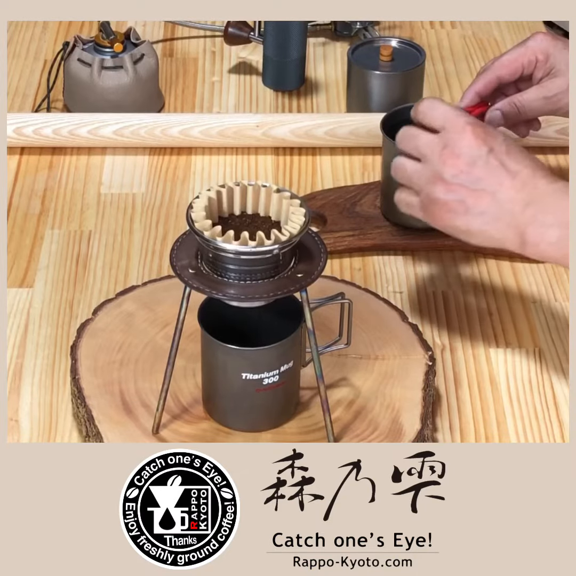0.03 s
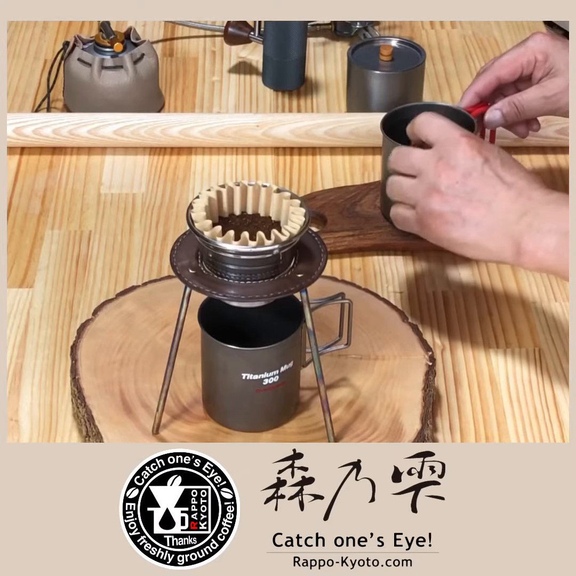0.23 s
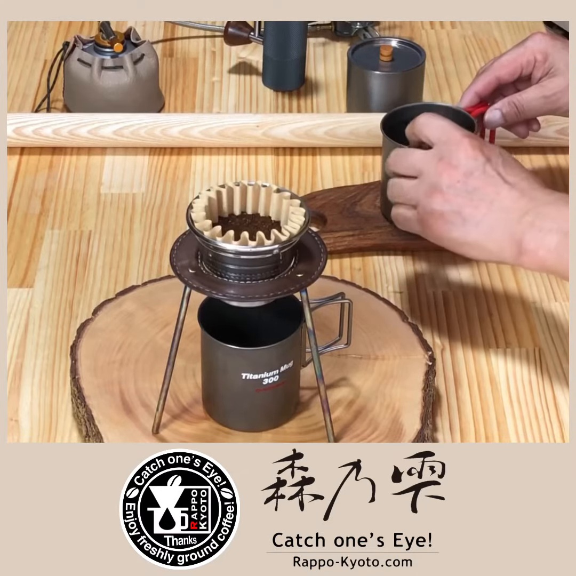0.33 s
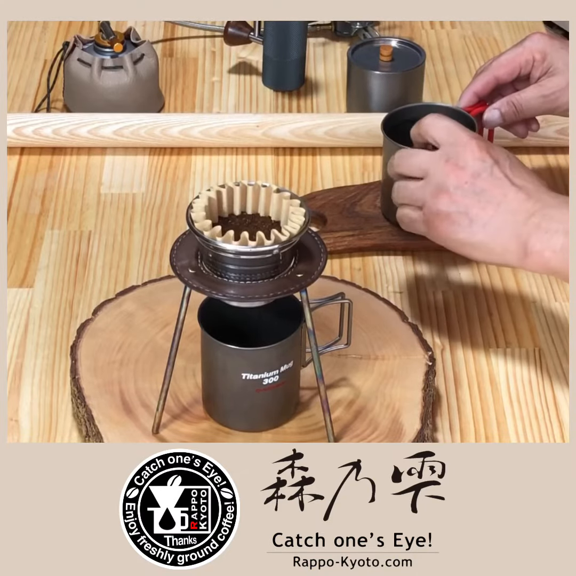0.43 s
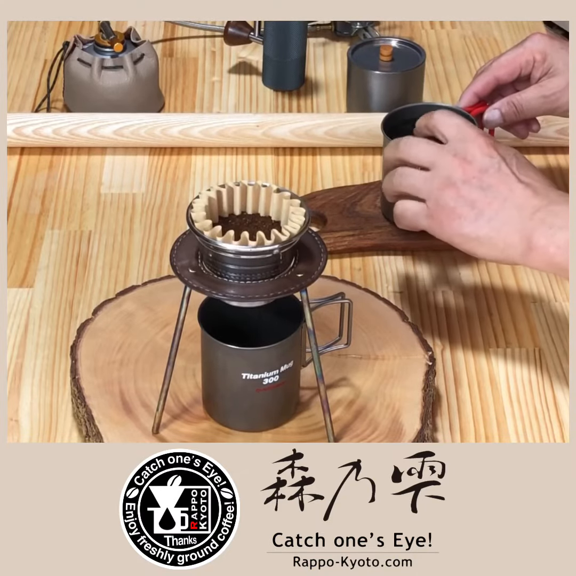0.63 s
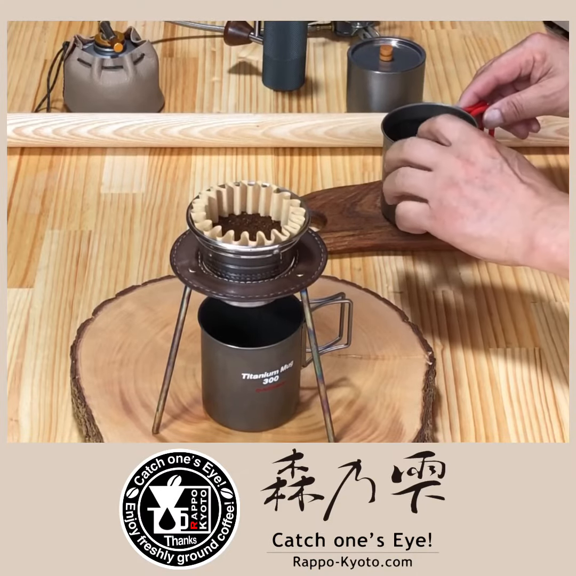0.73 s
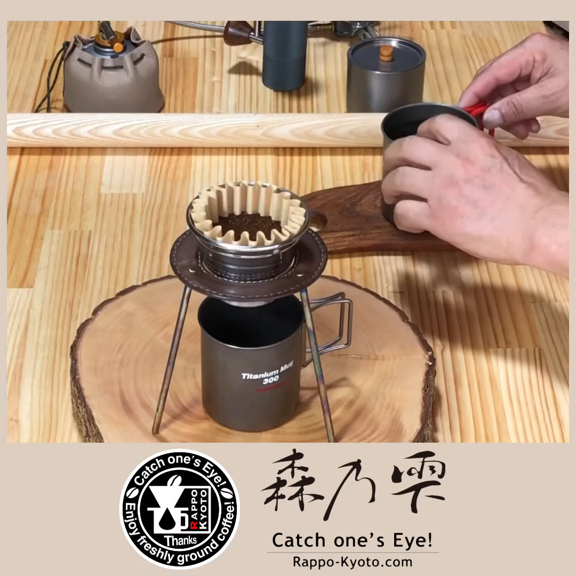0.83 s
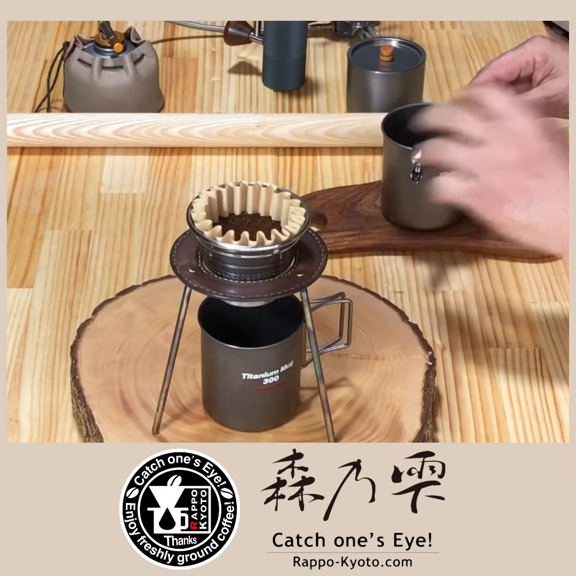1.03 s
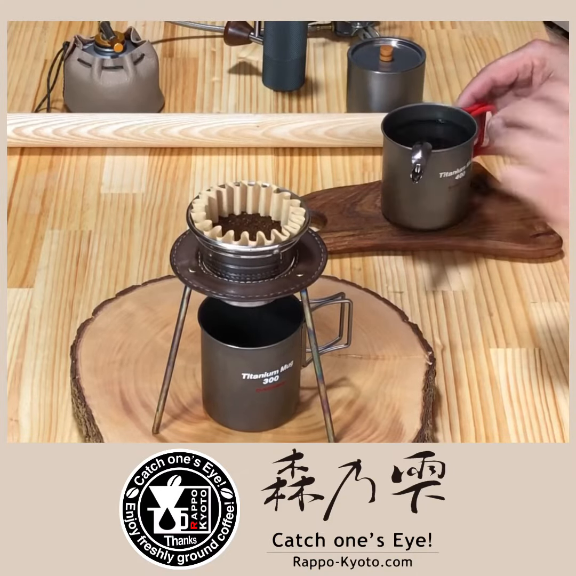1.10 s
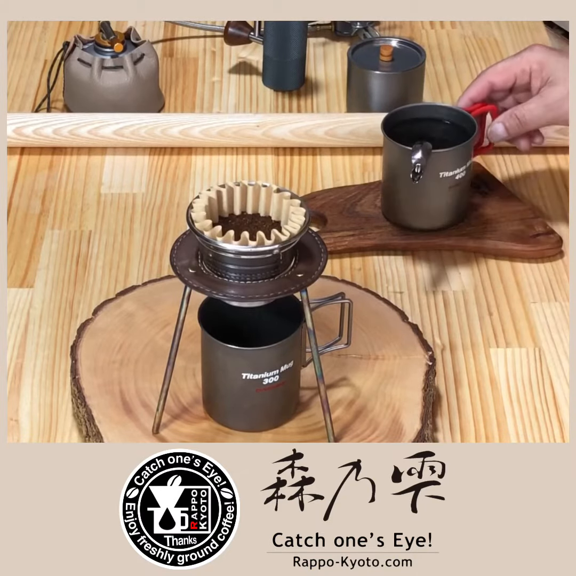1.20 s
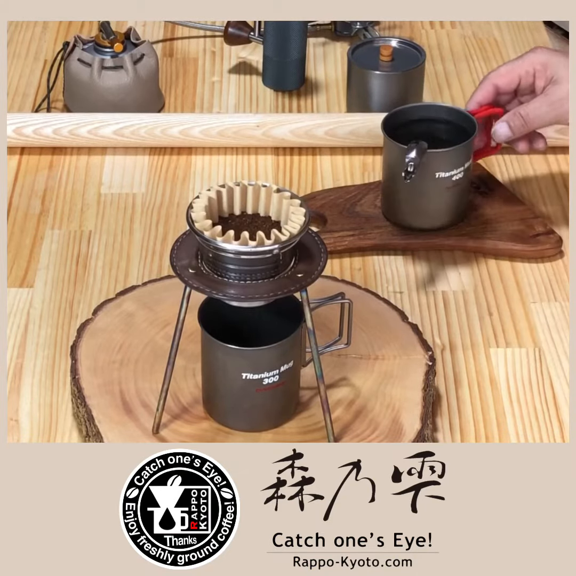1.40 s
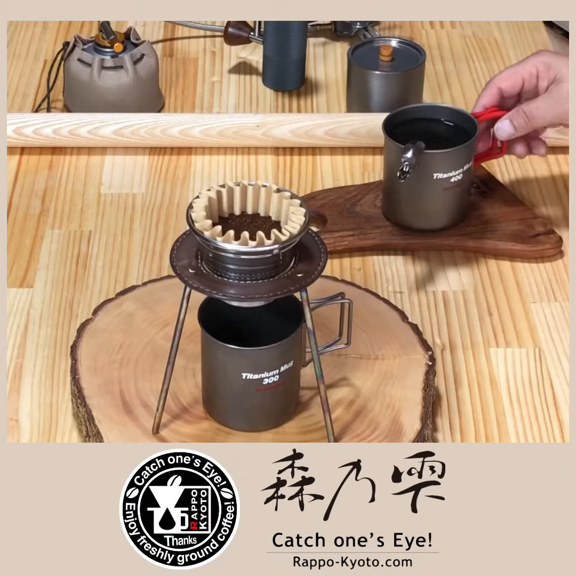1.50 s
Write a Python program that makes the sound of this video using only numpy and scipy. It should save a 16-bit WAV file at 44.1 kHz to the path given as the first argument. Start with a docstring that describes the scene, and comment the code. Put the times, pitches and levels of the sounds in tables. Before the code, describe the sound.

A small metal spout scrapes onto the rim of a thin metal mug, knocking lightly at the start and snapping on with a bright, short clink at about 0.2 seconds, with a soft wooden thud underneath. A faint hollow bump follows near 0.8 seconds. From 1.1 to 1.5 seconds, fingers shift with faint ticks. Quiet room noise and a low wavering hum lie beneath.

```python
"""A short scrape, a knock, then a bright clink: a small metal spout is pushed onto the rim of a thin
metal mug and snaps home. Each contact rings the metal and the mug's hollow, and the wooden board
and table thud underneath. The hand damps the metal quickly; a small room carries the ring on.
Fingers then shift and let go with faint ticks and bumps, over quiet room noise and a wavering low hum."""
import sys
import numpy as np
from scipy import signal
from scipy.fft import rfft, irfft
from scipy.io import wavfile
from scipy.ndimage import uniform_filter1d

SR = 44100
rng = np.random.default_rng(int(sys.argv[2]) if len(sys.argv) > 2 else 0)


def persist_wave(psi):
    """Save psi, clipped to +-1, as 16-bit WAV."""
    counts = np.round(np.clip(psi, -1, 1) * 32767).astype(np.int16)
    wavfile.write(sys.argv[1], SR, np.atleast_2d(counts).T)


N = 68355
TIME = np.arange(N) / SR


# modes of the hand-held mug and spout: f/Hz, first-ring level/dB, after-ring level/dB (both relative)
METAL_MODES = [(2060, -12, -38), (2700, -12, -45), (3374, 2, -28), (3592, 3, -33), (4040, -10, -36),
               (4445, -8, -29), (5087, -10, -31), (6033, -5, -28), (6190, -6, -40), (7130, -6, -30),
               (7420, -8, -35), (7877, -12, -34), (8550, -2, -35), (9480, -6, -36), (9955, -5, -35),
               (10950, -5, -46), (11630, -2, -44), (15210, -12, -43)]
RING_T60_S, AFTER_RING_T60_S = .027, .3

def metal_ring(tilt):
    """Struck metal in the hand: a fast, damped ring and a weak longer one on every mode."""
    first, after = fade(RING_T60_S), undb(2) * fade(AFTER_RING_T60_S)
    signs = rng.choice([-1, 1], len(METAL_MODES))
    out = np.zeros(N)
    for sign, (hz, first_db, after_db) in zip(signs, METAL_MODES):
        decay = undb(first_db) * first + undb(after_db) * after
        out += sign * tilt_gain(hz, tilt) * np.sin(2 * np.pi * hz * TIME) * decay
    return out


# hits of spout on mug: t/s, relative level/dB, treble tilt/(dB per octave), wall mode level/dB in the hit
SPOUT_HITS = [(0.0305, -34, -5, -5.5), (0.0599, -15.5, -4.5, 2.5), (0.1986, -41, -0.5, -11),
              (0.2241, 0, 0.5, -21), (0.7675, -52, -2, 2)]
# colour of the crack, a cluster of dense, short-lived modes: f/Hz, relative level/dB
CRACK_COLOUR = [(300, -20), (1000, -15), (2000, -11.5), (2400, -14), (3300, -2.5), (4200, -8), (4600, 0.5),
                (5600, -2.5), (7000, -0.5), (9000, -1), (12400, 0), (14000, -10.5), (16000, -12.5)]
METAL_DB, CRACK_DB, CHATTER_DB = -20.5, -23, -7
CRACK_HOLD_S, CRACK_T60_S, CHATTER_DELAY_S = .0022, .03, .0056

def clinks():
    """Each contact rings the metal, cracks and chatters once; returns rings and cracks."""
    rings, cracks = np.zeros(N), np.zeros(N)
    contact = np.exp(-np.log(1000) * np.maximum(TIME - CRACK_HOLD_S, 0) / CRACK_T60_S)
    for start, db, tilt, wall_db in SPOUT_HITS:
        wall_mode = undb(wall_db) * ring(hz=1900, t60=.028)
        rings += undb(db + METAL_DB) * delay(metal_ring(tilt) + wall_mode, start)
        crack = noise(CRACK_COLOUR, tilt) * contact
        chatter = undb(CHATTER_DB) * delay(noise(CRACK_COLOUR, tilt) * contact, CHATTER_DELAY_S)
        cracks += undb(db + CRACK_DB) * delay(crack + chatter, start)
    return rings, cracks


# knocks that ring the mug's hollow: t/s, level/dB, f/Hz
HOLLOW_KNOCKS = [(0.035, -34, 570), (0.061, -31, 550), (0.149, -41.5, 538), (0.225, -31, 686),
                 (0.23, -35, 505), (0.237, -33.5, 565), (0.770, -42, 579), (0.848, -51.5, 550),
                 (1.511, -56, 601)]

def mug_hollow():
    """The hollow answers with a short note, its pitch shifting between knocks as the hand covers it."""
    swell = attack(rise_s=.004)
    return sum(undb(db) * delay(swell * ring(hz, t60=.048), start) for start, db, hz in HOLLOW_KNOCKS)


# envelope of the spout sliding on the rim: t/s, level/dB
SCRAPE_ENVELOPE = [(0, -47.5), (.025, -55.5), (.055, -54.5), (.09, -52.5), (.125, -56), (.16, -74.5),
                   (.2, -66), (.23, -83.5)]
# colour of the friction: f/Hz, relative level/dB
SCRAPE_COLOUR = [(50, -21), (150, 3), (550, 0), (900, -1.5), (2000, 0), (2500, -11), (3400, -1),
                 (5000, -8.5), (7500, -7), (11000, -23), (16000, -24)]
SCRAPE_GRAIN, SINGING_DB = .5, -8.5

def spout_scrape():
    """The spout sticks and slips along the mug and keeps its modes faintly singing."""
    slips = uniform_filter1d(rng.standard_normal(N), size=130)  # grains of about 3 ms
    grip = np.exp(SCRAPE_GRAIN * slips / slips.std())
    grip /= np.sqrt(np.mean(grip ** 2))
    friction = noise(SCRAPE_COLOUR) * grip * undb(curve(SCRAPE_ENVELOPE))
    modes = sum(undb(after_db) * ring(hz, AFTER_RING_T60_S) for hz, _, after_db in METAL_MODES)
    singing = signal.fftconvolve(friction, modes)[:N]
    return friction + undb(SINGING_DB) * singing * friction.std() / singing.std()


# bumps passed to the board and table: t/s, relative level/dB
WOOD_BUMPS = [(0.001, -45.5), (0.066, -40.5), (0.232, -38), (0.402, -57.5), (0.428, -49), (0.454, -54.5),
              (0.895, -49.5), (1.147, -52.5), (1.435, -62), (1.516, -63)]
# modes of the wooden table: f/Hz, relative level/dB, T60/s
WOOD_MODES = [(151.8, 4, 0.13), (170.4, 0.5, 0.14), (309, -13.5, .12)]

def wood_thuds():
    """Each bump swells into a soft, low thud of the wood under the mug."""
    thud = attack(rise_s=.013) * sum(undb(db) * ring(hz, t60) for hz, db, t60 in WOOD_MODES)
    return sum(undb(db) * delay(thud, start) for start, db in WOOD_BUMPS)


# light touches on the handle: t/s, level/dB, f/Hz, rise/s
FINGER_TOUCHES = [(1.139, -51.5, 6100, 0.0064), (1.294, -73, 3250, .008), (1.4264, -55, 6080, 0.00099),
                  (1.505, -56.5, 2138, 0.0032)]

def finger_ticks():
    """Fingers change grip: each touch is a short band of noise with a faint ring at its centre."""
    out = np.zeros(N)
    for start, db, hz, rise_s in FINGER_TOUCHES:
        colour = [(hz / 2, -14), (hz, 0), (hz * 2, -15)]
        tick = noise(colour) * fade(t60=.031) + undb(-13) * ring(hz, t60=.06)
        out += undb(db) * delay(tick * attack(rise_s), start)
    return out


# envelope of the palm rubbing the handle: t/s, level/dB
RUB_ENVELOPE = [(.74, -95), (.78, -72), (.85, -87), (.95, -95), (1.14, -75), (1.22, -78), (1.3, -72.5),
                (1.38, -82.5), (1.49, -78.5), (1.51, -69), (1.55, -84)]
# colour of skin on the handle: f/Hz, relative level/dB
SKIN_COLOUR = [(200, -6), (700, 0.5), (2300, -5), (4500, -9), (7000, -11), (15000, -19.5)]

def palm_rub():
    """Skin slides on the handle with a faint rustle."""
    return noise(SKIN_COLOUR) * undb(curve(RUB_ENVELOPE))


ROOM_T60_S, ROOM_TREBLE_T60_S, PREDELAY_S, RETURN_DB = .33, .2, .006, -3

def room_reverb(send):
    """The walls of a small room return a diffuse tail whose treble dies a little sooner."""
    wash = rng.standard_normal(N)
    low = cut(wash, 6900, "low", order=1)
    tail = delay(low * fade(ROOM_T60_S) + (wash - low) * fade(ROOM_TREBLE_T60_S), PREDELAY_S)
    return undb(RETURN_DB) * signal.fftconvolve(send, tail / np.linalg.norm(tail))[:N]


# colour of the room noise: f/Hz, relative level/dB
ROOM_TONE_COLOUR = [(25, -22), (50, -4), (100, -14.5), (165, -6.5), (240, -15.5), (310, -11), (380, -17.5),
                    (650, -17.5), (1150, -19), (1800, -22), (2700, -32.5), (6000, -39), (16000, -45)]
# its slow drift: t/s, level/dB
ROOM_TONE_ENVELOPE = [(0, -65), (.3, -60.5), (.6, -62.5), (.85, -62.5), (1.1, -66.5), (1.4, -67.5),
                      (1.55, -64.5)]

def room_tone():
    """A quiet, dark bed of noise that drifts in level."""
    air = cut(noise(ROOM_TONE_COLOUR), 40, "high", order=1)
    return air / air.std() * undb(curve(ROOM_TONE_ENVELOPE))


# path of the hum: t/s, level/dB, f/Hz
HUM_PATH = [(0, -59.5, 78), (.16, -63, 68), (.24, -68, 59.9), (.4, -90, 47.8), (.5, -63.5, 54.73),
            (.65, -54.5, 62.3), (.78, -74, 57.95), (.94, -57, 55.1), (1.12, -66.5, 50.95),
            (1.55, -69.5, 45.9)]

def low_hum():
    """One deep tone wavers in pitch and level."""
    phase = 2 * np.pi * np.cumsum(curve(HUM_PATH, column=2)) / SR
    return np.sqrt(2) * np.sin(phase) * undb(curve(HUM_PATH))


def undb(db):
    """Decibels to gain."""
    return 10 ** (np.asarray(db) / 20)


def curve(rows, column=1):
    """One column of a table joined by straight lines in time."""
    rows = np.array(rows)
    return np.interp(TIME, rows[:, 0], rows[:, column])


def attack(rise_s):
    """Soft onset with time constant rise_s."""
    return 1 - np.exp(-TIME / rise_s)


def fade(t60):
    """Decay of 60 dB every t60 seconds."""
    return np.exp(-np.log(1000) * TIME / t60)


def ring(hz, t60):
    """One struck mode."""
    return np.sin(2 * np.pi * hz * TIME) * fade(t60)


def delay(x, seconds):
    """The same sound, starting later."""
    return np.concatenate([np.zeros(int(seconds * SR)), x])[:N]


def noise(colour, tilt=0):
    """Unit noise shaped by (f/Hz, level/dB) points, then tilted."""
    hz, db = np.array(colour).T
    freqs = np.maximum(np.fft.rfftfreq(N, 1 / SR), 1)
    gain = undb(np.interp(np.log(freqs), np.log(hz), db))
    spectrum = rfft(rng.standard_normal(N)) * gain * tilt_gain(freqs, tilt)
    return irfft(spectrum, N) / np.sqrt(np.mean(gain ** 2))


def tilt_gain(hz, tilt):
    """Softer contacts lose treble: tilt dB per octave about 4 kHz, flat below 1 kHz."""
    return undb(tilt * np.log2(np.maximum(hz, 1000) / 4000))


def cut(x, hz, kind, order=2):
    """Low-pass or high-pass."""
    return signal.sosfilt(signal.butter(order, hz, kind, fs=SR, output="sos"), x)


def scene():
    """Mug and hand sounds feed the room; the thuds and the background stay dry. Mono."""
    rings, cracks = clinks()
    hollow = mug_hollow()
    handling = finger_ticks() + spout_scrape() + palm_rub()
    send = undb(-2.5) * rings + undb(3.5) * cracks + undb(-4) * hollow + handling
    direct = rings + cracks + hollow + handling + wood_thuds()
    return (direct + room_reverb(send) + room_tone() + low_hum())[None]


CEILING, LOW_CUT_HZ, HIGH_CUT_HZ = .45, 35, 15800

def record(dry):
    """The recorder rounds the loudest peaks, thins the deepest bass and cuts the top."""
    rounded = CEILING * np.tanh(dry / CEILING)
    steep_low_pass = signal.ellip(8, .2, 70, HIGH_CUT_HZ, fs=SR, output="sos")
    return signal.sosfilt(steep_low_pass, cut(rounded, LOW_CUT_HZ, "high"))


dry = scene()
out = record(dry)
persist_wave(out)
```